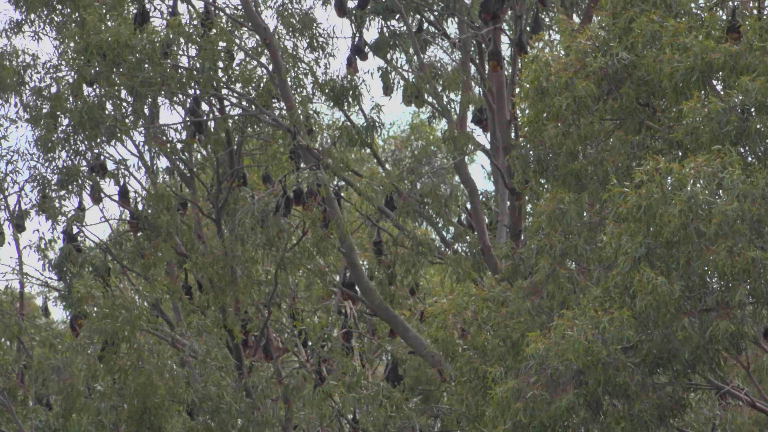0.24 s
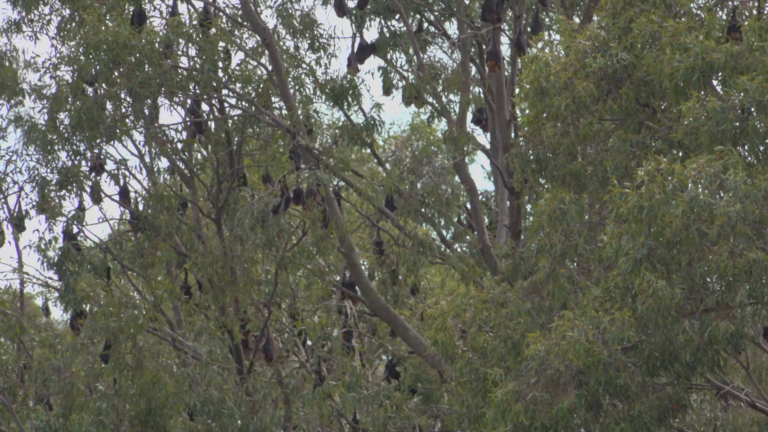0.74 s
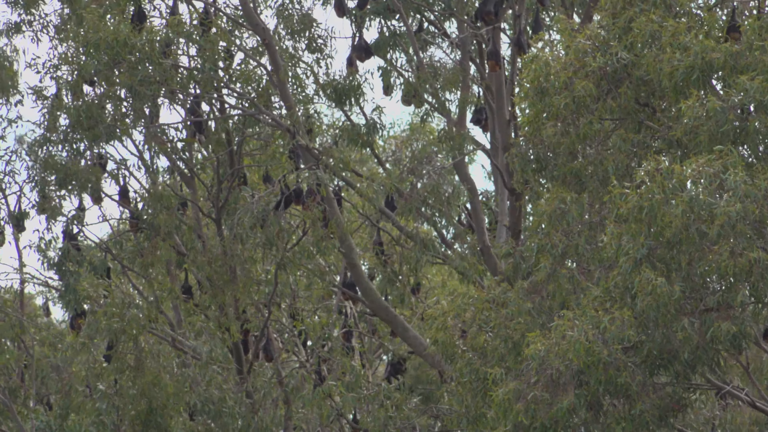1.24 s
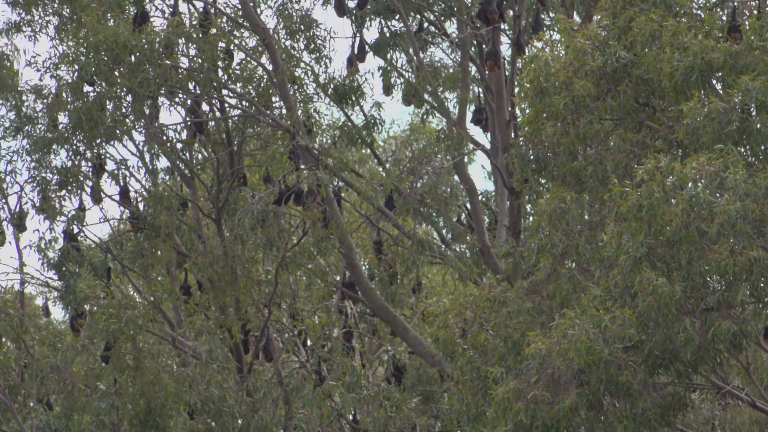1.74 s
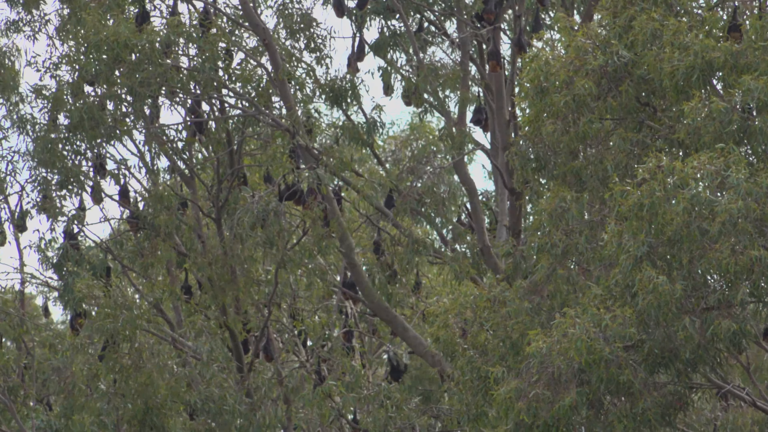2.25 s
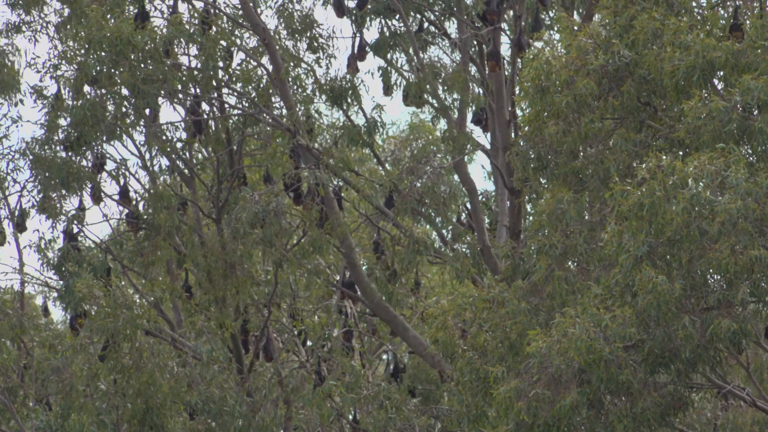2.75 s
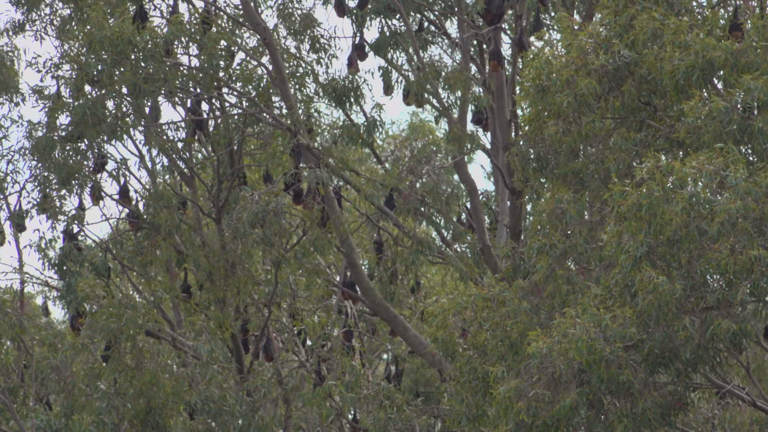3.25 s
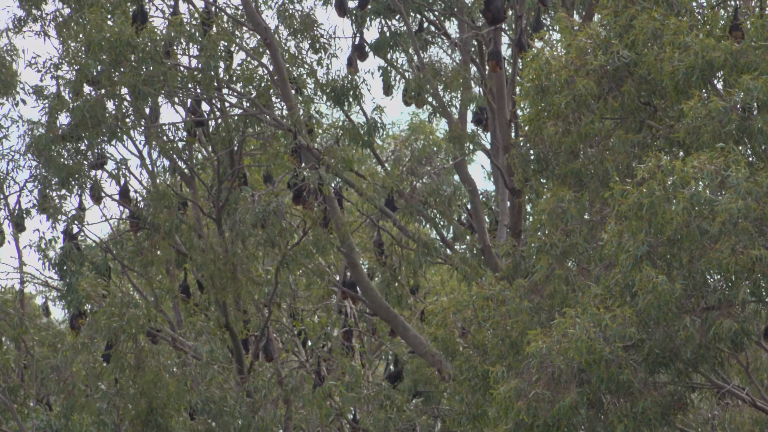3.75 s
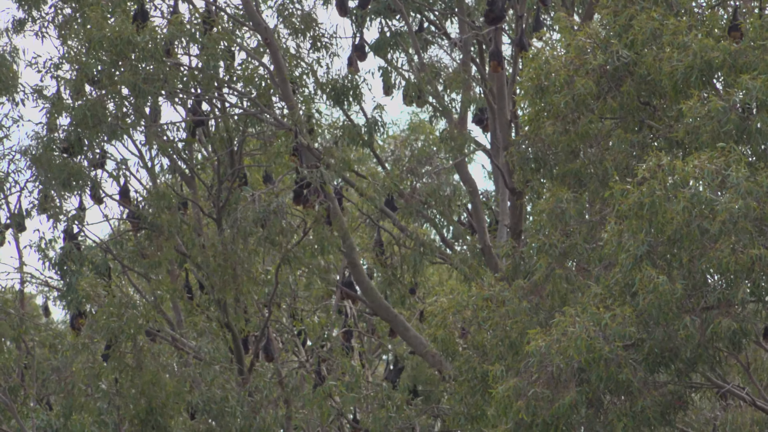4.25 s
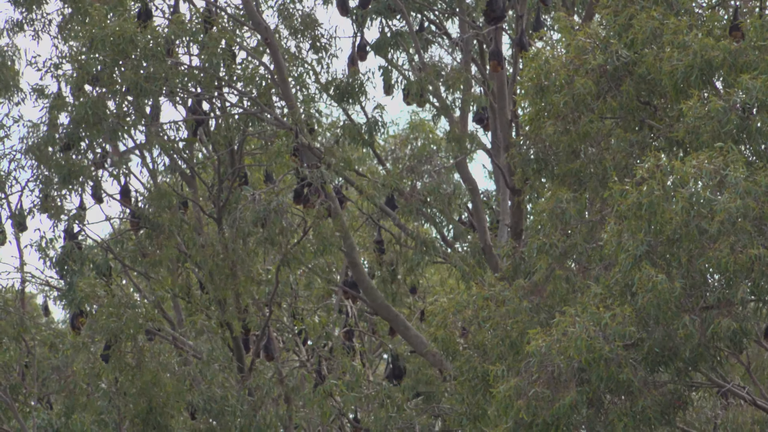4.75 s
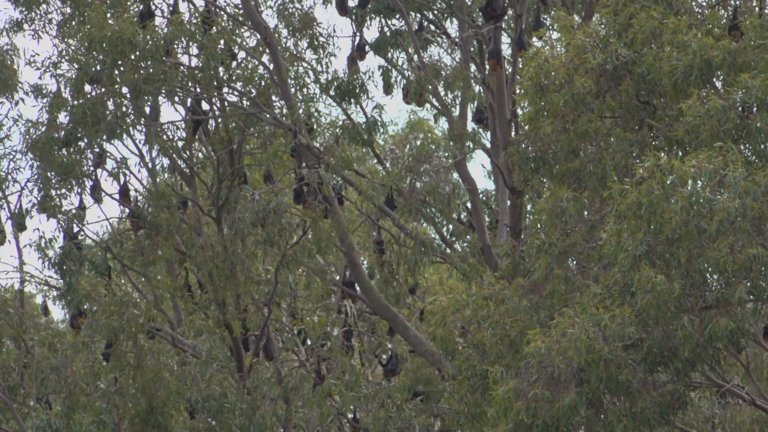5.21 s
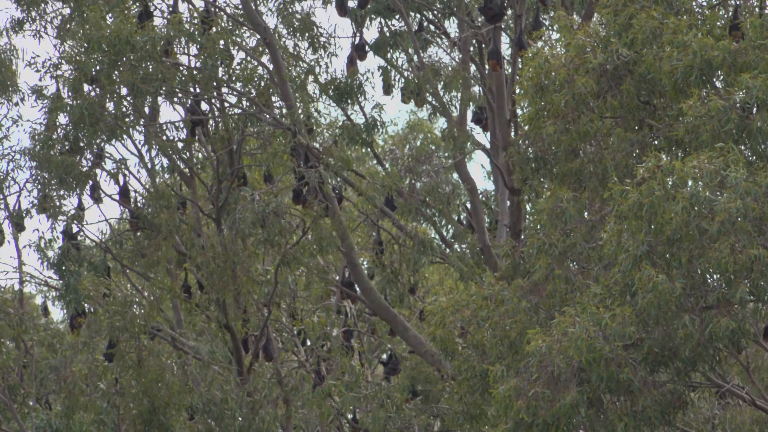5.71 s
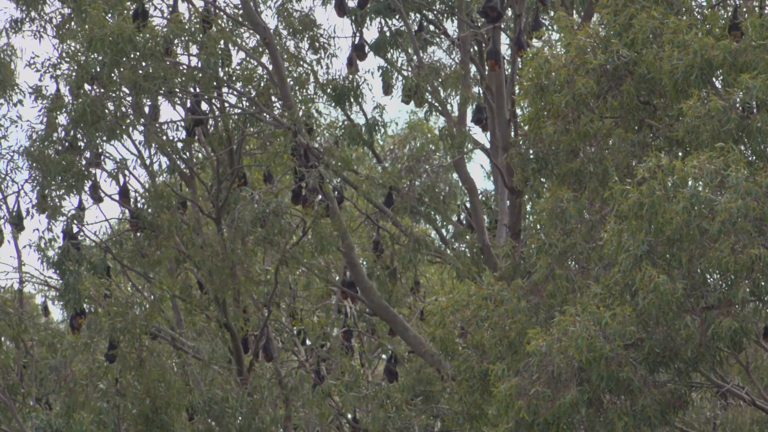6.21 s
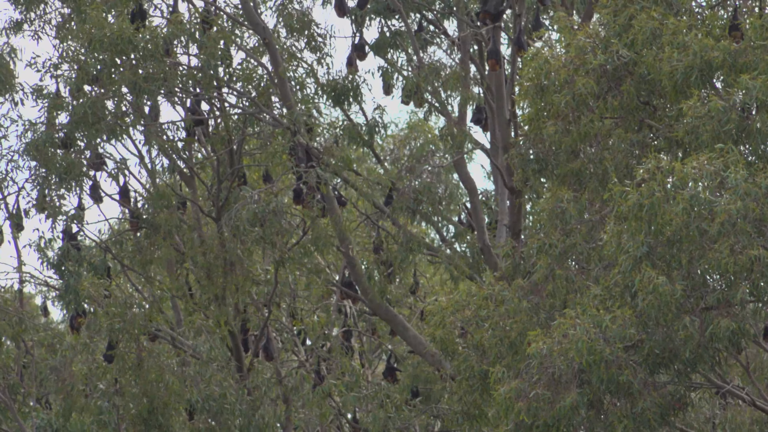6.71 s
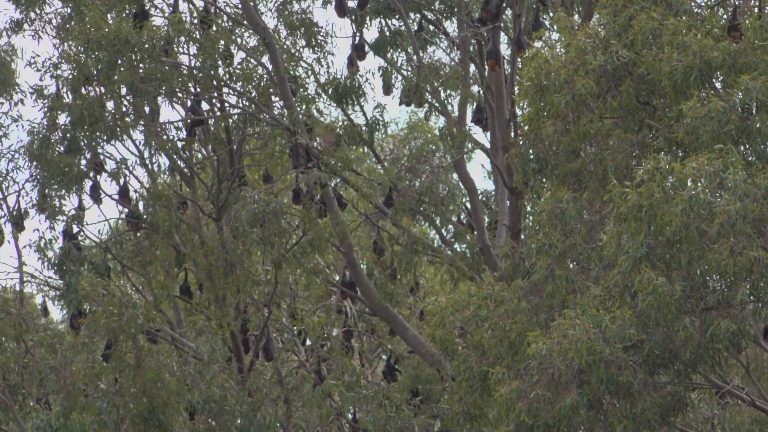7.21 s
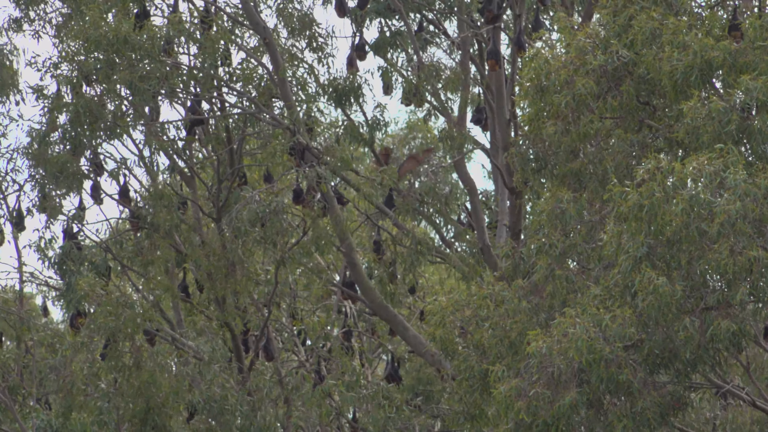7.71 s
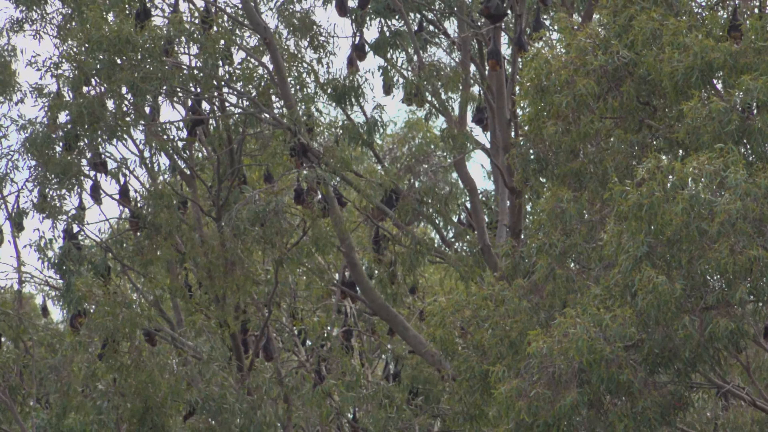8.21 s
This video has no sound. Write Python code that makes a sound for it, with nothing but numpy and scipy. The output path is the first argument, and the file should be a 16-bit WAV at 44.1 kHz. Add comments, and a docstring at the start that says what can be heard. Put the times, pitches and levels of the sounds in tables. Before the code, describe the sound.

A big colony of fruit bats squawks hoarsely, squeals, whistles and twitters without pause among tall trees, while wind gusts thump the microphone.

```python
'''Fruit bat roost in tall trees

Near bats squawk hoarsely, squeal with wavering voices, whistle thinly, twitter, screech, peep and tick.
Voices are pulses and puffs of air rung through throat and mouth resonances; whistles are a few sine partials.
Random chirps make the farther roost, and the trees scatter every call. Shaped noise makes a broad din,
a low outdoor rumble and gusts that buffet the microphone, most towards the end.'''
import sys
import numpy as np
from scipy import signal
from scipy.io import wavfile
from scipy.ndimage import uniform_filter1d

SR = 44100
rng = np.random.default_rng(int(sys.argv[2]) if len(sys.argv) > 2 else 0)


def digitize_waveform(pressure):
    """Quantize a signal to 16-bit integers and store it at the path in sys.argv[1].

    Rows of a 2-D input are taken as channels; values are limited to [-1, 1].
    """
    field = np.atleast_2d(pressure).T
    bounded = np.clip(field, -1, 1)
    quanta = np.round(bounded * 32767).astype(np.int16)
    wavfile.write(sys.argv[1], SR, quanta)


N = 373086  # length [samples]
USUAL_PITCH_HZ = 563  # pitch at which the throat and mouth resonances have their stated frequencies


def amp(db):
    """Decibels to gain."""
    return 10 ** (np.asarray(db) / 20)


def evened(x):
    """Scales to rms 1."""
    return x / np.sqrt(np.mean(x ** 2) + 1e-20)


def read(points, hz):
    """Reads a table on a log-frequency axis."""
    f, value = np.transpose(points)
    return np.interp(np.log(hz + 1), np.log(f + 1), value)


def curves(rows):
    """Sample times of a call and each of its controls along them."""
    s, *columns = np.transpose(rows)
    t = np.arange(s[0], s[-1], 1 / SR)
    return t, [np.interp(t, s, column) for column in columns]


def course(length):
    """Progress 0-1 through a call of this length [s], and an arch of mean 0 that tops in its middle."""
    u = np.linspace(0, 1, int(max(length, .02) * SR))
    return u, np.sin(np.pi * u) - 2 / np.pi


def add(mix, s, sound, pan_db=0):
    """Adds a sound at time s, leaning left by pan_db (right if negative)."""
    part = mix[:, max(round(s * SR), 0):][:, :len(sound)]
    part += amp([[pan_db / 2], [-pan_db / 2]]) * sound[:part.shape[1]]


def waver(size, rate):
    """Smooth random drift, made of straight lines between normal draws at rate per second."""
    knots = rng.standard_normal(2048)
    return np.interp(np.arange(size) * rate / SR % len(knots), np.arange(len(knots)), knots)


def fade(size, edge_s):
    """Soft start and end."""
    return signal.windows.tukey(size, min(1, 2 * edge_s * SR / size))


def resonate(x, hz, width):
    """A steep moving resonance: shift hz down to zero, smooth twice, shift back."""
    turn = np.exp(2j * np.pi * np.cumsum(hz * np.ones(len(x))) / SR)
    r = np.exp(-np.pi * width / SR)
    smoothed = signal.lfilter([1], [1, -2 * r, r * r], x / turn)
    return evened((turn * smoothed).real)


def noise(colour, patchy_db):
    """Two-channel noise of a given spectrum, with patches that drift in time and frequency."""
    # left-right likeness: (frequency [Hz], correlation [-1 to 1])
    likeness = [(30, 0.24), (100, 0.8), (300, 0.7), (1000, 0.92), (8000, 0.83), (13000, 0.52)]
    hz = np.fft.rfftfreq(2048, 1 / SR)
    a, b, c, d, patches = rng.standard_normal((5, N // 512 + 6, len(hz)))
    patches = uniform_filter1d(patches, size=6, axis=0)
    patches = evened(uniform_filter1d(patches, size=14, axis=1))
    same = np.clip(read(likeness, hz), -1, 1)
    left = a + 1j * b
    right = same * left + np.sqrt(1 - same ** 2) * (c + 1j * d)
    z = np.array([left, right]) * amp(read(colour, hz) + patchy_db * patches)
    return evened(signal.istft(z.transpose(0, 2, 1), nperseg=2048, noverlap=1536)[1][:, :N])


def rumble():
    """Low outdoor rumble: almost steady noise, strongest around 50-60 Hz."""
    # spectrum: (frequency [Hz], relative level [dB])
    drone_colour = [(25, -32), (48, -3), (61, -0.5), (75, -14.5), (100, -15.5), (160, -28), (9000, -37),
                    (15000, -36.5)]
    return amp(-58.0) * noise(drone_colour, patchy_db=1)


def din():
    """Blurred broadband din of the place: patchy noise, a touch stronger on the right."""
    # spectrum: (frequency [Hz], relative level [dB])
    din_colour = [(12, -36), (20, -22), (64, -1), (225, -9), (342, -8), (534, -4.5), (857, -8.5),
                  (1980, -4.5), (2470, -2), (2840, -1), (5380, -7.5), (9390, -20.5), (10800, -29.5),
                  (15500, -90)]
    return amp(-42) * noise(din_colour, patchy_db=1.5) * amp([[-.3], [.3]])


def wind(level_db=0, lean_db=-3.0):
    """Gusts swell out of the breeze and thump the microphone, harder on the right."""
    # steady breeze: (time [s], level before the lean [dB])
    breeze = [(0, -60), (2.6, -62), (3.15, -45), (3.8, -59), (4.4, -54.5), (5.3, -58.5), (6.4, -71),
              (7.2, -53), (7.6, -45), (8.46, -57.5)]
    # gusts: (time of peak [s], peak level before the lean [dB], time from peak to half amplitude [s])
    gusts = [(0.64, -49, .02), (2.8, -50, .04), (2.99, -34, 0.02), (3.318, -35.5, 0.015),
             (4.36, -43, 0.034), (4.57, -32.5, 0.033), (4.872, -42, .028), (6.64, -46.5, 0.061),
             (7.08, -38.5, 0.016), (7.417, -38, .035), (7.576, -33, .035), (8.026, -35, 0.031)]
    # spectrum of the buffeting: (frequency [Hz], relative level [dB])
    gust_colour = [(8.8, -38), (15, -14), (43, 5), (63, 3.5), (105, -10.5), (194, -32.5), (220, -53),
                   (290, -62), (480, -120)]
    t = np.arange(N) / SR
    power = amp(np.interp(t, *np.transpose(breeze))) ** 2
    for s, db, half_s in gusts:
        power += (amp(db) / (1 + ((t - s) / half_s) ** 2)) ** 2
    eddies = noise(gust_colour, patchy_db=-6.0)
    # level out the eddies, so that breeze and gusts set their strength
    eddies /= np.sqrt(uniform_filter1d((eddies ** 2).mean(0), size=3000) + 1e-6)
    return eddies * np.sqrt(power) * amp(level_db) * amp([[lean_db], [-lean_db]])


def trees(x):
    """Trunks and leaves scatter the calls into sparse random echoes; the top treble dies first."""
    # reverberation: (frequency [Hz], time to fall by 60 dB [s])
    decay = [(300, 0.41), (3000, 0.53), (7000, 0.29), (13000, 0.067)]
    echoes = rng.choice([-1., 1.], (2, SR // 2)) * (rng.random((2, SR // 2)) < .06)
    hz, t, z = signal.stft(echoes, SR, nperseg=256)
    z = z * amp(-60 * t / read(decay, hz)[:, None])
    tail = signal.istft(z, SR, nperseg=256)[1]
    return signal.fftconvolve(x, tail / np.linalg.norm(tail[0]), axes=1)[:, :N]


def larynx(hz, rough, flutter_db=-1.0, flutter_rate=150):
    """Pulses mixed with a puff of air in each cycle; roughness adds puffs and jitter, and the level flutters."""
    size = len(hz)
    rough = np.clip(rough, 0, 1)
    jitter = .012 * waver(size, 70) + rough * (.035 * waver(size, 220) + .045 * waver(size, 700))
    phase = np.exp(2j * np.pi * np.cumsum(hz * (1 + jitter)) / SR)
    # harmonics 3 to 18, each .93 of the one below
    pulses = (phase ** 3 * (1 - (.93 * phase) ** 16) / (1 - .93 * phase)).real
    puffs = (0.7 + phase.real) * rng.standard_normal(size)
    source = (1 - rough) * evened(pulses) + rough * evened(puffs)
    return source * amp(flutter_db * waver(size, flutter_rate))


def cry(centre_hz, length, hz, rough, width):
    """One short syllable: larynx and one resonance, which arch together in frequency."""
    size = int(max(length, .02) * SR)
    u = np.linspace(-1, 1, size)
    arch = 1 - .1 * u ** 2 + .07 * rng.standard_normal() * u
    return resonate(larynx(hz * arch, rough), centre_hz * arch, width) * fade(size, 0.0067)


def roost(count=420, level_db=-55, spread_db=-2.0, centre_hz=3500, pitch_hz=640, dull_db=-6):
    """Many farther bats chirp at random, each with its own voice and level; the air dulls the high ones."""
    out = np.zeros((2, N))
    times = rng.random(count) * N / SR
    lengths = rng.uniform(.025, .12, count)
    voices = rng.standard_normal((count, 4))
    for s, length, (near, colour, pitch, side) in zip(times, lengths, voices):
        octaves = .95 * np.tanh(colour)
        call_pitch = pitch_hz * np.exp(.17 * pitch)
        call = cry(centre_hz * 2 ** octaves, length, call_pitch, rough=0.28, width=500)
        db = level_db + spread_db * min(near, 1) + dull_db * max(octaves, 0)
        add(out, s, amp(db) * call, 1.0 * side)
    return signal.sosfilt(signal.butter(4, 9500, fs=SR, output="sos"), out)


def ticks(level_db=-6, tick_s=0.0013, uneven_s=.0008):
    """A near bat ticks in quick runs that fade: short bursts of noise ringing at 10 kHz."""
    # runs: (time [s], length [s], first level before trim [dB])
    tick_runs = [(1.898, .13, -38.5), (4.8214, .01, -49), (5.7014, .01, -48), (6.335, .035, -43)]
    gap_s, fade_db_per_s = .0148, 55
    out = np.zeros((2, N))
    u = np.arange(SR // 60) / SR / tick_s
    for s, length, db in tick_runs:
        for late in np.arange(0, length, gap_s):
            ring = resonate(rng.standard_normal(len(u)), 10000, 3000)
            tick = u * np.exp(1 - u) * ring
            start = s + late + uneven_s * rng.standard_normal()
            add(out, start, amp(db + level_db - fade_db_per_s * late) * tick, -1)
    return out


def whistle(hz, partials, jitter, tilt_db=0):
    """The voice in a thin high register: a few flickering partials, tilted about the third."""
    size = len(hz)
    shake = .009 * waver(size, 55) + jitter * (.7 * waver(size, 110) + waver(size, 1500))
    turns = np.cumsum(hz * (1 + shake)) / SR
    tone = 0
    for k, level in partials:
        lean_db = tilt_db * (k - 3) + 3.5 * waver(size, 70)
        tone = tone + amp(level + lean_db) * np.sin(2 * np.pi * k * turns)
    return tone * fade(size, 0.011)


def screeches(level_db=-12):
    """Short harsh screeches: rough syllables through a wide high resonance."""
    # (time [s], level before trim [dB], resonance before its arch [Hz])
    screech_calls = [(0.177, -30.5, 4870), (0.848, -37, 5900), (1.389, -34.5, 6100), (2.262, -32, 5080),
                     (3.186, -30, 4800), (3.516, -34, 5230), (4.305, -36, 5670), (5.06, -36, 5040),
                     (5.525, -31, 4950), (6.254, -33, 5300), (6.916, -30.5, 5100), (7.315, -31.5, 5300),
                     (7.843, -38, 5630), (8.421, -31, 5820)]
    out = np.zeros((2, N))
    for s, db, hz in screech_calls:
        add(out, s, amp(db + level_db) * cry(hz, 0.071, 720, rough=0.59, width=2500), -1)
    return out


def yelps(level_db=-12):
    """Faint far yelps: rough syllables whose narrow resonance sits on the third harmonic."""
    # (time [s], level before trim [dB], resonance before its arch [Hz])
    yelp_calls = [(0.366, -43, 980), (0.945, -40.5, 1122), (3.368, -40, 1060), (8.298, -39.5, 1147)]
    out = np.zeros((2, N))
    for s, db, hz in yelp_calls:
        add(out, s, amp(db + level_db) * cry(hz, 0.0824, hz / 3, rough=0.6, width=320))
    return out


def peeps():
    """Pure peeps that ring through the hoarse calls: one gliding, arching partial."""
    # (time [s], length [s], first pitch [Hz], last pitch [Hz], pitch arch [share], level [dB])
    peep_calls = [(.28, .23, 3900, 3860, 0, -49), (.495, 0.062, 3400, 3160, 0.032, -42),
                  (1.615, 0.063, 2330, 2390, .015, -42), (2.227, .05, 2360, 2440, 0, -43),
                  (2.69, .04, 2600, 2640, .01, -41), (3.19, 0.076, 2230, 2170, 0.0064, -41),
                  (3.66, .17, 2560, 2590, 0, -43), (4.2, .065, 4380, 4080, 0, -45),
                  (6.022, .11, 2850, 2950, 0.055, -48), (6.807, .03, 2710, 2580, 0, -42.5),
                  (6.885, 0.089, 3330, 3530, 0.036, -40), (7.8, .045, 2450, 2410, 0, -46),
                  (7.904, 0.054, 4130, 3950, 0, -45), (8.07, 0.11, 2970, 3030, 0.061, -45)]
    out = np.zeros((2, N))
    for s, length, first_hz, last_hz, rise, db in peep_calls:
        u, arch = course(length)
        hz = (first_hz + (last_hz - first_hz) * u) * (1 + rise * arch)
        add(out, s, amp(db) * whistle(hz, [(1, 0)], jitter=0.0071), -1)
    return out


def twitters(level_db=5, pip_rate=72, pip_spread_db=3.5, pan_db=-5.5):
    """Arching whistles chopped into uneven pips."""
    # (time [s], length [s], base frequency [Hz], level before trim [dB])
    twitter_calls = [(3.504, 0.17, 2900, -59), (5.71, 0.27, 2570, -48), (6.37, .035, 2850, -44),
                     (6.41, .25, 3040, -59.5)]
    # (multiple of the base frequency, relative level [dB])
    twitter_partials = [(2, -1), (3, -3.5), (4, -9.5), (5, -16)]
    pitch_arch = 0.059  # share by which the pitch rises towards the middle
    out = np.zeros((2, N))
    for s, length, hz, db in twitter_calls:
        u, arch = course(length)
        tone = whistle(hz * (1 + pitch_arch * arch), twitter_partials, jitter=0.037)
        beat = np.cumsum(pip_rate * (1 + 0.323 * waver(len(u), 59))) / SR
        pips = np.sin(np.pi * beat) ** 6
        pip_db = db + level_db + pip_spread_db * waver(len(u), pip_rate)
        add(out, s, amp(pip_db) * tone * pips, pan_db)
    return out


def whistles(level_db=-0.5, pan_db=-5.0):
    """Held thin whistles scoop up to their pitch while they glide."""
    # (time [s], length [s], first base frequency [Hz], last base frequency [Hz], scoop from below [0-1],
    #  level before trim [dB], jitter [share], tilt [dB per partial])
    whistle_calls = [ (0.124, 0.22, 3080, 2860, .08, -61, 0.063, 3),
                     (0.493, 0.23, 2880, 3040, 0, -59.5, .03, 1),
                     (1.133, .17, 2700, 2790, .25, -50.5, 0.01, 0),
                     (1.291, 0.044, 3170, 2960, 0.03, -49.5, 0.011, -4),
                     (1.545, .027, 2490, 2430, 0.02, -48, .012, 1.5),
                     (1.68, 0.078, 2680, 2340, 0.02, -55, 0.027, 4),
                     (2.5, 0.053, 2490, 2530, 0, -52.5, .016, 2),
                     (2.625, 0.072, 3050, 2720, 0.08, -57, 0.025, 4),
                     (3.173, .15, 2480, 2590, 0.1, -56.5, .035, 4),
                     (3.985, .045, 2495, 2540, 0, -58, .012, 3),
                     (4.806, 0.15, 2900, 2980, 0.08, -57, .02, -6.5),
                     (6.016, .12, 3200, 2840, 0.16, -53.5, .026, 1), ]
    # the fundamental is lost in the throat: (multiple of the base frequency, relative level [dB])
    whistle_partials = [(2, 7), (3, 4), (4, -6), (5, -25)]
    scoop_s = 0.033  # time constant of the slide up
    out = np.zeros((2, N))
    for s, length, first_hz, last_hz, scoop, db, jitter, tilt_db in whistle_calls:
        u, _ = course(length)
        glide_hz = first_hz + (last_hz - first_hz) * u
        hz = glide_hz * (1 - scoop * np.exp(-u * length / scoop_s))
        add(out, s, amp(db + level_db) * whistle(hz, whistle_partials, jitter, tilt_db), pan_db)
    return out


def off_branch(x):
    """A branch beside the caller adds one short echo, which makes the harmonics uneven."""
    delay = int(rng.uniform(.001, .004) * SR)
    return .93 * x + .36 * np.pad(x, (delay, 0))[:len(x)]


def voice(hz, rough, throat_hz, throat_db, mouth_hz, mouth_db, rasp_db=-np.inf,
          throat_width=680, mouth_width=1150, rasp_hz=6200, rasp_width=2100, rasp_trim_db=-3,
          stutter_db=1.8, stutter_rate=42.0):
    """A near bat: the larynx rings the throat and mouth; a squawk adds a breathy rasp above."""
    rough = np.clip(rough, 0, 1)
    source = larynx(hz, rough)
    call = amp(throat_db) * resonate(source, throat_hz, throat_width)
    call -= amp(mouth_db) * resonate(source, mouth_hz, mouth_width)
    rasp = resonate(larynx(hz, rough), rasp_hz, rasp_width)
    call += amp(rasp_db + rasp_trim_db) * np.sqrt(2 * rough) * rasp
    # hoarse calls break into uneven syllables
    call *= amp(stutter_db * 2 * rough * waver(len(hz), stutter_rate))
    voice_range = signal.butter(4, [1750, 10000], "bandpass", fs=SR, output="sos")
    return off_branch(signal.sosfilt(voice_range, call)) * fade(len(hz), 0.01)


def squeals(pan_db=-4.5):
    """Clearer calls with a wavering pitch, from the right; the mouth opens as the pitch rises."""
    # one curve per squeal: (time [s], pitch [Hz], throat resonance [Hz], throat level [dB],
    #  mouth level [dB], roughness [0-1])
    squeal_curves = [
        [(0.635, 510.5, 2650, -35, -46, .6), (0.71, 481, 2650, -40, -65, 0.47),
         (0.785, 537, 2600, -39, -64, 0.44), (0.845, 520, 2620, -39.5, -54, 0.2),
         (0.9, 583, 2500, -38.5, -54, 0.3), (0.93, 557, 2480, -50, -53, .5)],
        [(1.07, 485, 2400, -46, -53, .55), (1.12, 521, 2380, -40, -55, .5),
         (1.152, 504.4, 2450, -35.5, -63, 0.48), (1.204, 564, 2560, -30.5, -62, 0.34),
         (1.256, 525, 2580, -33.5, -65, 0.33), (1.312, 595, 2700, -38, -65, 0.04),
         (1.335, 563, 2740, -44, -60, 0.1)],
        [(4.75, 890, 2650, -44, -55, .3), (4.83, 691, 2270, -48, -54, .3), (4.89, 735, 2260, -45, -59, 0.15),
         (4.95, 745, 2300, -41.5, -54, 0.29), (5.0, 814, 2380, -45, -54, .25), (5.07, 865, 2550, -45, -58, 0.3)],
        [(5.51, 772, 2900, -46.5, -49, 0.3), (5.61, 587, 2480, -59, -45.5, 0.36),
         (5.71, 597, 2500, -52, -44, 0.35), (5.83, 588, 2400, -47, -49, .33), (5.95, 623, 2480, -52, -47, .4),
         (6.0, 699, 2740, -45, -41, .55), (6.085, 754, 2900, -49, -60, 0.29), (6.16, 620, 2600, -51, -49, .5)],
        [(7.99, 510, 2250, -35, -54, .55), (8.04, 545, 2400, -41, -50, 0.67), (8.09, 586, 2580, -42, -59, 0.42),
         (8.14, 619, 2800, -43, -51, .3), (8.2, 562, 2560, -46, -53, .45), (8.23, 578, 2450, -42.5, -54, .5),
         (8.28, 665, 2530, -46, -51, 0.4)],
    ]
    usual_mouth_hz, mouth_follow = 4030, 0.22  # the exponent by which the mouth resonance follows pitch
    out = np.zeros((2, N))
    for rows in squeal_curves:
        t, (hz, throat_hz, throat_db, mouth_db, rough) = curves(rows)
        mouth_hz = usual_mouth_hz * (hz / USUAL_PITCH_HZ) ** mouth_follow
        add(out, t[0], voice(hz, rough, throat_hz, throat_db, mouth_hz, mouth_db), pan_db)
    return out


def squawks(level_db=-1.5, pan_db=-0.6):
    """Hoarse calls that glide from one pitch to another and swell in the middle."""
    # levels before trim: (time [s], length [s], first pitch [Hz], last pitch [Hz], throat level [dB],
    #  mouth resonance [Hz], mouth level [dB], rasp level [dB], roughness [0-1])
    squawk_calls = [ (0.179, 0.12, 589, 550, -62, 4050, -37, -65, 0.82),
                    (0.274, 0.29, 553, 565.7, -63, 3950, -36, -52, 0.59),
                    (0.483, 0.066, 570, 537, -41, 3260, -36.5, -56, 0.4),
                    (0.551, 0.085, 596, 481, -43, 3850, -40, -51, .55),
                    (1.386, 0.09, 581, 546, -54, 3730, -42, -52, 0.8),
                    (1.463, 0.17, 610, 551, -39.5, 3700, -44, -50, 0.73),
                    (1.616, 0.16, 587, 584, -43, 3720, -56, -46, 0.52),
                    (1.824, 0.071, 475, 583, -38, 4300, -58, -41, 0.34),
                    (1.894, 0.14, 527, 549, -42.5, 3900, -51, -47, 0.72),
                    (2.03, .19, 560, 589, -46, 3020, -44, -48, 0.72),
                    (2.219, 0.23, 600, 609, -43.5, 4470, -48.5, -48, 0.65),
                    (2.442, 0.41, 625, 607, -45.5, 3780, -51, -63, 0.77),
                    (2.872, 0.23, 552, 521, -44, 4000, -44.5, -72, 0.54),
                    (3.083, 0.126, 545, 559, -42.5, 4330, -40.5, -60, 0.67),
                    (3.189, .15, 552, 594, -45.5, 4800, -43, -58, 0.7),
                    (3.481, 0.14, 609, 512, -45, 3860, -45.5, -54, 0.68),
                    (3.582, 0.27, 504, 517, -40.5, 3860, -41, -64, 0.55),
                    (3.848, 0.12, 532, 579, -53, 3750, -42, -48, .75),
                    (3.98, 0.18, 635, 613, -44.5, 3780, -44.5, -51.5, 0.82),
                    (4.142, 0.15, 617, 590, -44, 4050, -41, -53, 0.88),
                    (4.288, 0.37, 670, 710, -45.5, 4030, -45.5, -51, 0.72),
                    (4.805, 0.17, 744, 720, -45.5, 3950, -42, -52, 0.52),
                    (4.997, 0.18, 760, 745, -48.5, 4080, -40.5, -67, 0.38),
                    (5.14, 0.17, 736, 788, -56, 4300, -39, -49, 0.51),
                    (5.533, 0.31, 609, 608, -56, 4600, -46.5, -60, .38),
                    (6.256, 0.12, 670, 670, -54, 4460, -49, -64, 0.94),
                    (6.328, 0.042, 596, 656, -38, 4400, -44, -42, 0.38),
                    (6.351, 0.24, 606, 603, -57, 4100, -42, -61, 0.4),
                    (6.6, 0.057, 520, 552, -47, 3550, -36.5, -61, .6),
                    (6.734, 0.036, 516, 530, -46, 3800, -40.5, -61, 0.76),
                    (6.789, .19, 541, 597, -44.5, 3570, -42, -53, 0.71),
                    (6.984, .08, 588, 523, -52, 4330, -48, -52, 0.9),
                    (7.068, 0.13, 590, 523, -47, 3850, -68, -60, 0.54),
                    (7.248, 0.31, 600, 620, -61, 3800, -48, -65, 0.73),
                    (7.64, 0.043, 557, 586, -45.5, 3500, -42.5, -62, 0.7),
                    (7.769, 0.21, 624, 595, -44.5, 3950, -59, -62, 0.65),
                    (7.96, .2, 551, 600, -42.5, 4200, -49, -57, .75), ]
    usual_throat_hz, throat_follow = 2500, 0.32  # the exponent by which the throat resonance follows pitch
    pitch_arch, swell_db = .012, 0.5  # rise of pitch [share] and of level towards the middle
    out = np.zeros((2, N))
    for s, length, first_hz, last_hz, throat_db, mouth_hz, mouth_db, rasp_db, rough in squawk_calls:
        u, arch = course(length)
        hz = (first_hz + (last_hz - first_hz) * u) * (1 + pitch_arch * arch)
        throat_hz = usual_throat_hz * (hz / USUAL_PITCH_HZ) ** throat_follow
        call = voice(hz, rough, throat_hz, throat_db, mouth_hz, mouth_db, rasp_db)
        add(out, s, amp(level_db + swell_db * arch) * call, pan_db)
    return out


def scene():
    """Bats near and far among the trees, over the blurred din, a low rumble and the wind."""
    background = rumble() + din() + wind()
    small_calls = ticks() + screeches() + yelps() + peeps()
    bats = roost() + small_calls + twitters() + whistles() + squeals() + squawks()
    return background + amp(-18) * trees(bats) + amp(-0.67) * bats


def record(dry):
    """The microphone softens the top treble; then the recorder's band limit cuts above 15.8 kHz."""
    soft = signal.sosfilt(signal.butter(2, 14000, fs=SR, output="sos"), dry)
    band_limit = signal.firwin(511, 15800, window=("kaiser", 9), fs=SR)
    return signal.oaconvolve(soft, band_limit[None], "same")


dry = scene()
out = record(dry)
digitize_waveform(out)
```